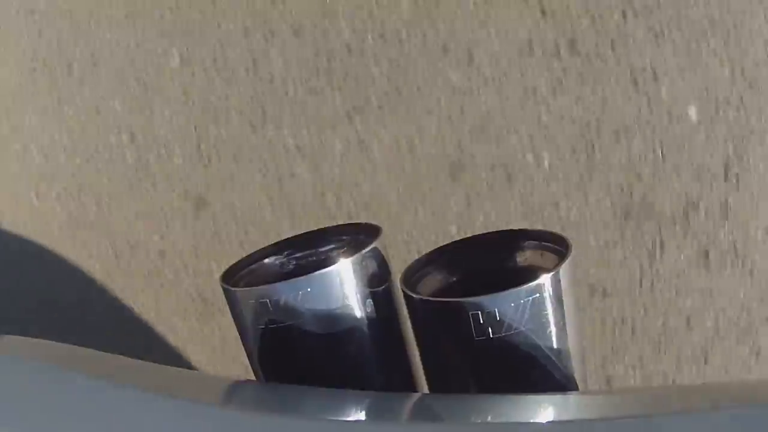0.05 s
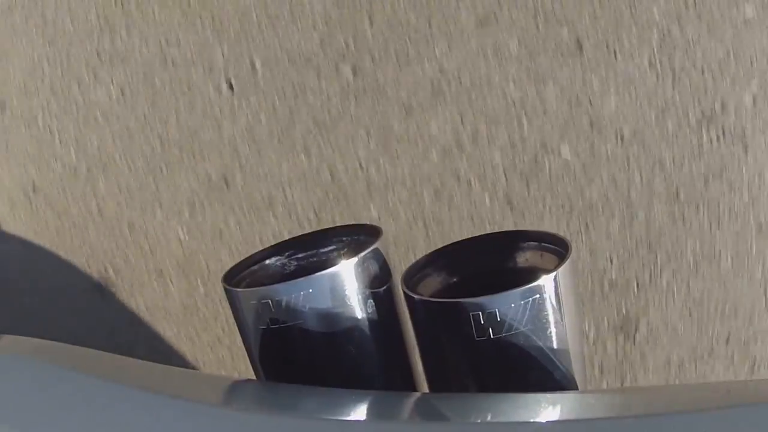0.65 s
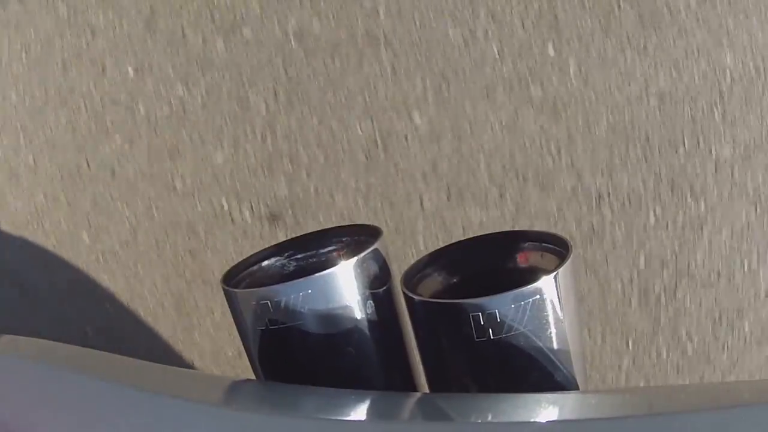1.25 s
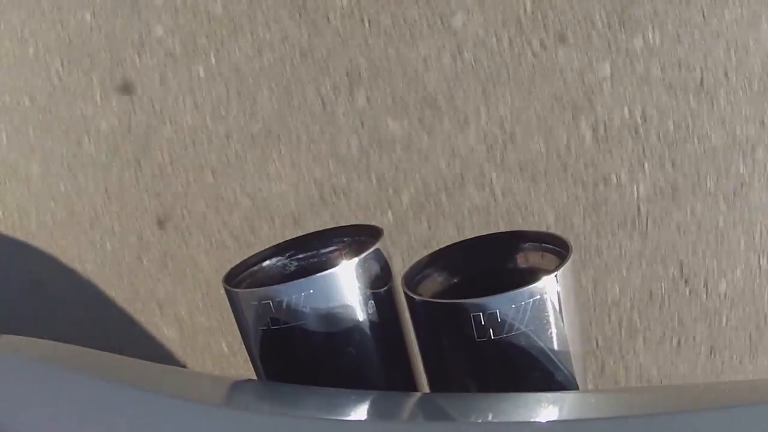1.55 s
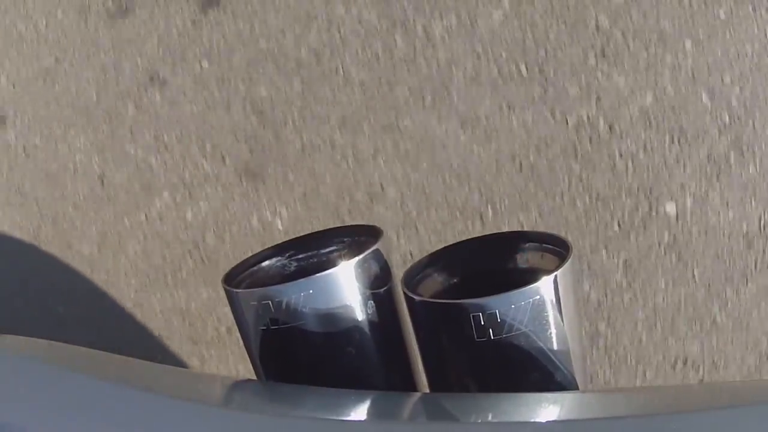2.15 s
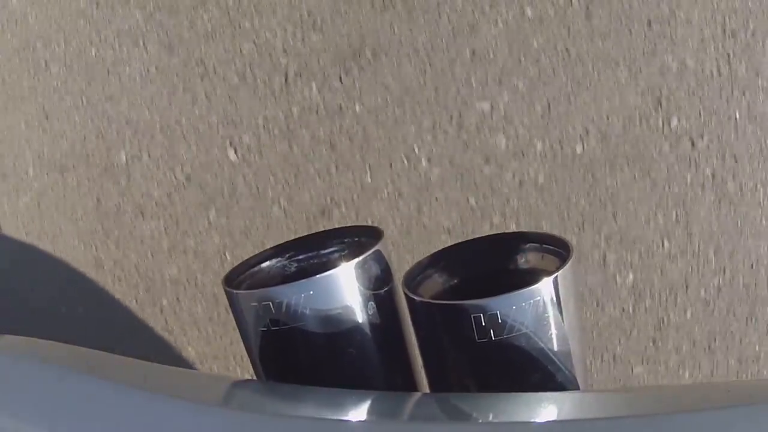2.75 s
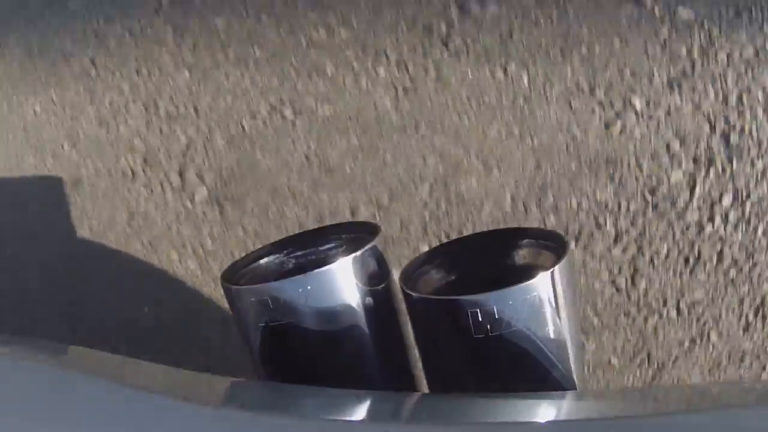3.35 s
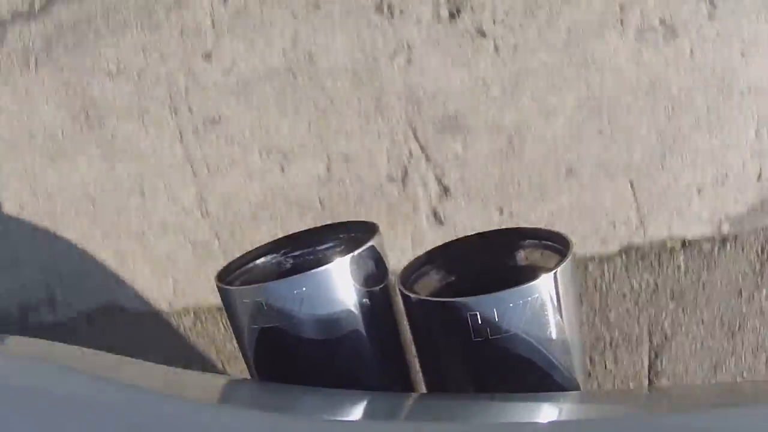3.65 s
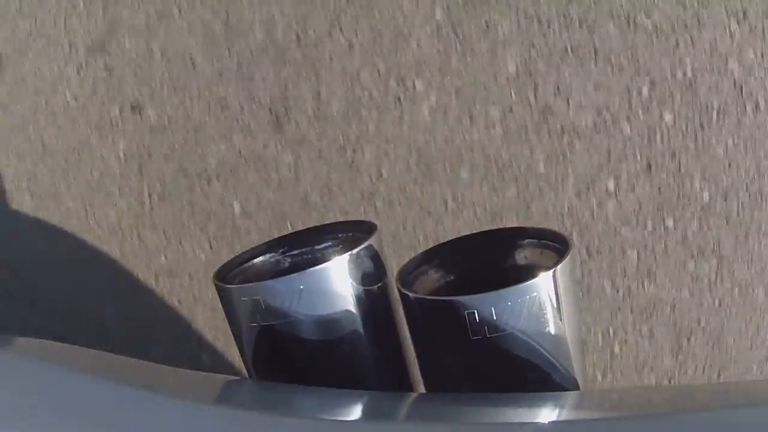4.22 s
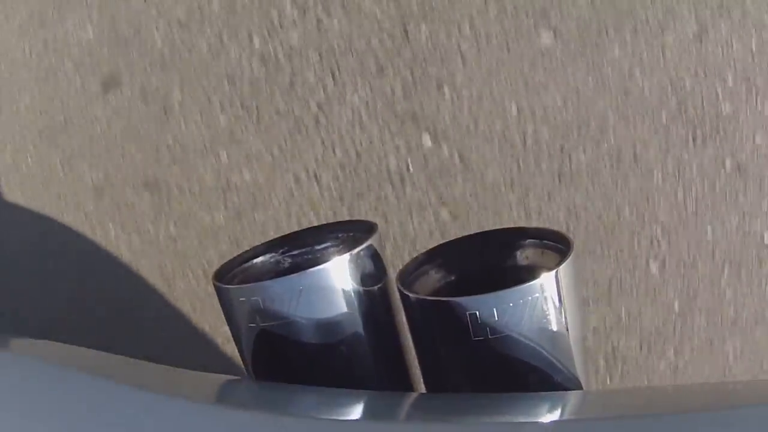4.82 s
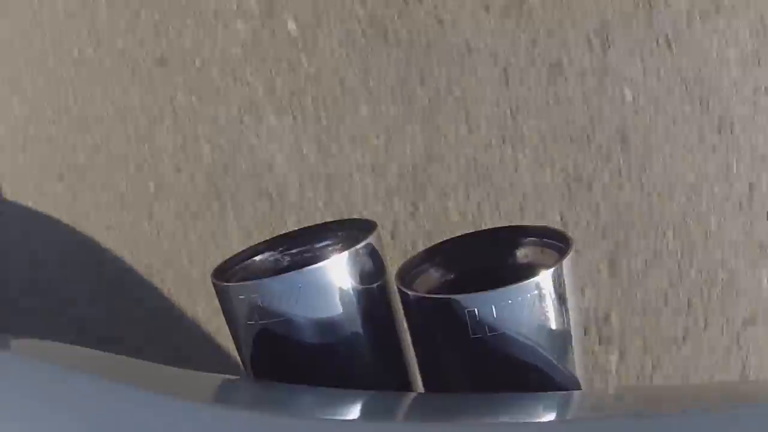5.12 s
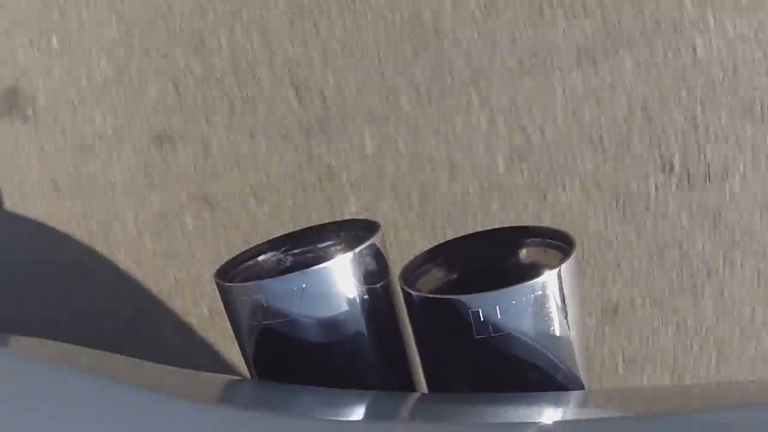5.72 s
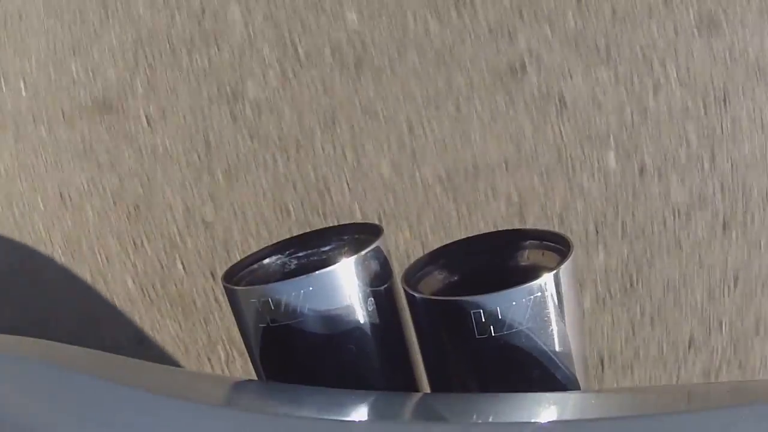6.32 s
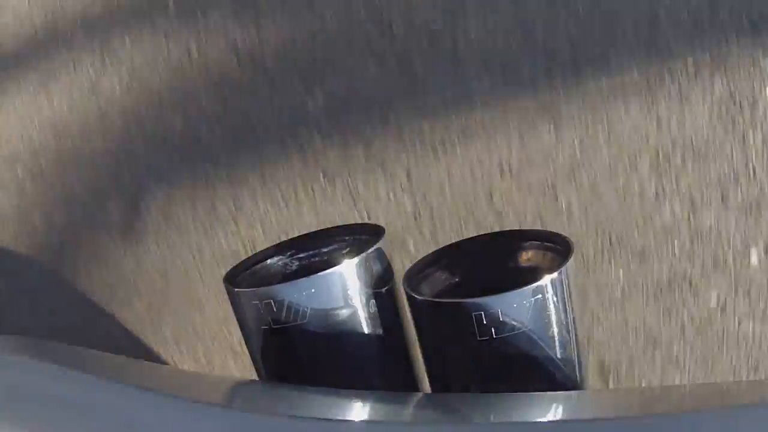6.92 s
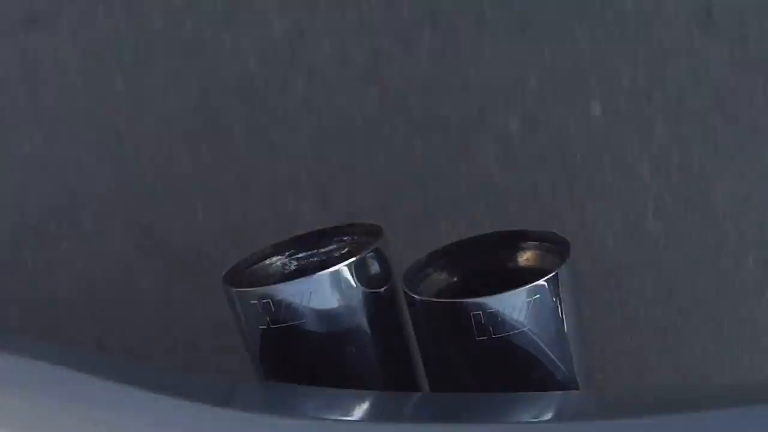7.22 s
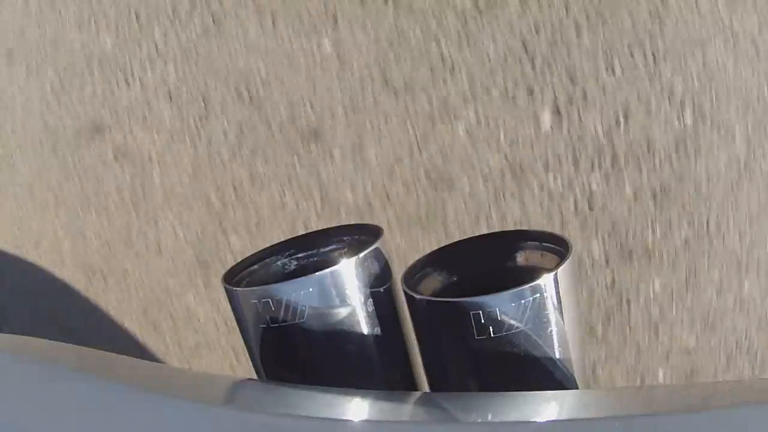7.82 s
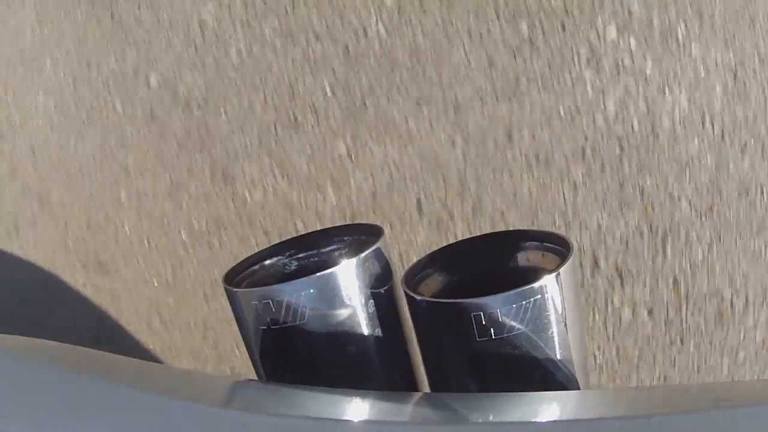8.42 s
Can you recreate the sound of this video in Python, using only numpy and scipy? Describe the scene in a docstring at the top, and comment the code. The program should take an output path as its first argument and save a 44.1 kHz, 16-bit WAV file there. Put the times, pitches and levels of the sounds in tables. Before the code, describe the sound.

A four-cylinder car is heard on the move from just above its twin tailpipes, with tyre rush and low wind rumble underneath. For the first 3 seconds the exhaust burbles and throbs at part throttle, revs swelling and sagging twice, with pops around 0.4 and 0.8 seconds and a scatter from 1.8 to 2.7. At about 3.3 seconds a faint motor whine with small clicks opens the exhaust flap. From 3.6 the engine pulls hard, climbing into a loud, raspy, howling roar that peaks near 5.1. One upshift drops the pitch with a rapid volley of pops, and the roar continues until 6 seconds. The throttle then lifts, leaving a deep drone that slowly falls in pitch. Around 8 seconds the flap faintly whirrs and clicks shut, with one pop and a wind gust, and the revs begin rising again.

```python
"""Four-cylinder car at the tailpipes

Heard from just above the twin tips while driving. Firing pulses burble through the pipe at part throttle.
A motor opens the exhaust flap; turbulent gas rings the open pipe and roars through one upshift with a
volley of fuel pops. The engine drones down on the overrun until the flap shuts. Tyres and wind rush below."""
import sys
import numpy as np
from scipy import signal
from scipy.fft import rfft, irfft, next_fast_len
from scipy.io import wavfile
from scipy.ndimage import uniform_filter1d

SR = 44100
rng = np.random.default_rng(int(sys.argv[2]) if len(sys.argv) > 2 else 0)


def waveform_to_disk(signal):
    """Save audio, clipped to [-1, 1], as 16-bit WAV at the path in sys.argv[1]."""
    frames = np.transpose(np.atleast_2d(signal))
    scaled = np.clip(frames, -1, 1) * 32767
    samples = np.round(scaled).astype(np.int16)
    wavfile.write(sys.argv[1], SR, samples)


N = 373086
TIME = np.arange(N) / SR

# silencer and open-pipe resonances: f/Hz, width/Hz, gain/dB
SILENCER_MODES = [(97.5, 17, -3), (173, 86, -3.5), (275, 15, 5), (520.5, 46, 0.5), (570, 110, -19.5)]
ROAR_MODES = [(452, 60, -1), (660, 130, -5), (770, 60, -8), (1000, 50, -11), (1160, 80, -11)]
# flap motor runs, opening then shutting: start/s, end/s, level/dB
FLAP_RUNS = [(3.293, 3.594, -44.5), (7.80, 8.147, -46)]
# running states, each level/dB: harmonics 1-4, overtones, cylinder imbalance, ragged firing, road rush
PART_THROTTLE = (-37, -21.5, -19.5, -25, -28, -3.5, -27, -28.5)
CRACKLE = (-29.5, -30, -27, -40, -32, -3, -28.5, -29.5)
THROB = (-24, -26.5, -24.5, -32.5, -33, -5, -28.5, -31)
LULL = (-32, -32.5, -27.5, -26.5, -44.5, 3, -39, -32.5)
LIGHT_PULL = (-18, -20.5, -24.5, -29, -45.5, 9, -31.5, -29)
HARD_PULL = (-18, -28, -15, -24, -26.5, -6, -26, -26.5)
GROWL = (-17, -21, -20.5, -32, -21, -5.5, -26.5, -24)
FULL_THROTTLE = (-22.5, -28, -23, -23.5, -32, -1.5, -31, -26.5)
LIFT_OFF = (-26, -24, -36, -41, -36.5, -5.5, -32.5, -34.5)
COASTING = (-13, -25, -24.5, -27, -28, -5, -41, -29.5)


def from_db(db):
    """Decibels to gain."""
    return 10 ** (np.asarray(db) / 20)


def rms_one(x):
    """Scale to rms 1."""
    return x / np.sqrt(np.mean(x ** 2) + 1e-20)


def in_time(points):
    """A (t/s, value) curve at every sample."""
    return np.interp(TIME, *np.transpose(points))


def at_hz(points, hz):
    """Read a spectrum on a log-frequency axis."""
    f, db = np.transpose(points)
    return np.interp(np.log(hz), np.log(f), db)


def ramp(start_s, length_s):
    """Rise from 0 to 1, then hold."""
    return np.clip((TIME - start_s) / length_s, 0, 1)


def swells(rows):
    """Sum of triangles, rows of t/s, half length/s, height."""
    return sum(height * np.maximum(1 - abs(TIME - s) / half_s, 0) for s, half_s, height in rows)


def drift(rate_hz):
    """Slow random wander, rms 1."""
    r = np.exp(-80 * np.pi * rate_hz / SR)
    slow = signal.lfilter([1], [1, -2 * r, r * r], rng.standard_normal(N // 40 + 2002))[2000:]
    return np.interp(np.arange(N) / 40, np.arange(len(slow)), rms_one(slow))


def noise(spectrum):
    """Coloured noise, rms 1, falling steeply below the first point."""
    size = next_fast_len(N, True)
    hz = np.maximum(np.fft.rfftfreq(size, 1 / SR), 1)
    gain = from_db(at_hz(spectrum, hz)) * np.minimum(hz / spectrum[0][0], 1) ** 4
    white = rng.standard_normal(2 * len(hz) - 2)
    return rms_one(irfft(rfft(white) * gain, size)[:N])


def resonate(x, modes):
    """Parallel resonators, rows of f/Hz, width/Hz, gain/dB."""
    out = 0
    for hz, width_hz, db in modes:
        r = np.exp(-np.pi * width_hz / SR)
        b = [(1 - r * r) / 2, 0, (r * r - 1) / 2]
        a = [1, -2 * r * np.cos(2 * np.pi * hz / SR), r * r]
        out += from_db(db) * signal.lfilter(b, a, x + 1e-18)
    return out


def cut(x, hz, kind, order=2):
    """Butterworth low- or high-pass."""
    return signal.sosfilt(signal.butter(order, hz, kind, fs=SR, output="sos"), x + 1e-18)


def driving():
    """Cross-faded running states: their columns and the engine level/dB at every sample."""
    # start/s, fade/s, running state, engine level/dB
    drive = [(0, .05, PART_THROTTLE, -0.5), (.2, 0.092, CRACKLE, 1.5), (.47, 0.045, THROB, 0),
             (1.21, 0.24, LULL, -7), (1.36, 0.092, PART_THROTTLE, -0.7), (1.76, .05, CRACKLE, -1),
             (2.32, .03, THROB, 0.4), (2.67, 0.074, LULL, 1.5), (2.93, 0.52, LIGHT_PULL, 1),
             (3.39, 0.15, HARD_PULL, 0), (3.96, 0.29, GROWL, 0), (4.45, 0.45, FULL_THROTTLE, -2.5),
             (5.35, 0.3, FULL_THROTTLE, 0.5), (5.94, 0.074, LIFT_OFF, 1.5), (6.13, 0.29, COASTING, -.5),
             (7.1, 0.38, COASTING, 0.5), (8.01, .17, PART_THROTTLE, .6)]
    settings = np.array([(*state, db) for _, _, state, db in drive])
    fades = np.array([ramp(start_s, fade_s) for start_s, fade_s, *_ in drive[1:]])
    return settings[0][:, None] + np.diff(settings, axis=0).T @ fades


def with_revs(law, firing_hz):
    """Gain rising with the firing rate up to a top."""
    top_db, top_hz, slope_db_per_hz = law
    return from_db(top_db - slope_db_per_hz * np.maximum(top_hz - firing_hz, 0))


def road_and_wind(rush_db):
    """Air and tyres rush, swelling at a bump; eddies behind the bumper buffet the microphone."""
    # spectra: f/Hz, relative density/dB
    road_spectrum = [(300, 4.5), (700, 1), (1000, 1.5), (1200, -3.5), (1450, -15.5), (2100, -15),
                     (2850, -30.5), (3800, -28), (5000, -31.5), (5750, -42), (6800, -39), (7800, -49.5),
                     (9200, -50.5), (14000, -72.5)]
    wind_spectrum = [(14, -11.5), (25, 13.5), (50, 16.5), (100, 6), (250, 10), (600, -56)]
    # wind: t/s, level/dB
    wind_level = [(0, -28.5), (3.2, -24), (4.35, -32.5), (4.7, -53), (6, -45.5), (6.4, -39), (8.46, -35.5)]
    # road bump and gusts: t/s, half length/s, rise/dB
    bumps = [(.787, 0.02, 9)]
    gusts = [(1.85, .12, 9), (3.68, .3, 7.5), (6.3, .12, 11.5), (8.05, .13, 22)]
    tyres = noise(road_spectrum) * from_db(rush_db + swells(bumps))
    eddies_db = 1.5 * drift(8)
    wind = noise(wind_spectrum) * from_db(in_time(wind_level) + swells(gusts) + eddies_db)
    return tyres + wind


def flap(rise_s=0.0018, decay_s=0.0096, fade_s=0.0091, click_db=-9, scrape_db=-9, waver_db=3):
    """A small motor whines as it turns the flap; the linkage scrapes and clicks against its stops."""
    # linkage clicks: t/s, relative level/dB, hard-stop share/dB
    knocks = [(3.308, -27.5, -18), (3.566, -29.5, -8.5), (7.809, -31.5, -17), (7.945, -42, -27),
              (7.998, -43, -30), (8.041, -39, -3), (8.066, -36, -20), (8.127, -37.5, -15.5)]
    # linkage and stop resonances: f/Hz, width/Hz, gain/dB
    linkage_modes = [(2830, 840, 9), (4280, 450, 16), (5070, 400, -1)]
    stop_modes = [(6900, 280, 10), (8540, 440, 9), (11800, 1200, -11)]
    # motor whine: f/Hz, relative level/dB
    whine_lines = [(2003, 1), (4006, -46)]
    linkage = rms_one(cut(resonate(rng.standard_normal(N), linkage_modes), 6000, "low", order=4))
    stop = rms_one(resonate(rng.standard_normal(N), stop_modes))
    clicks = 0
    for s, db, stop_db in knocks:
        envelope = ramp(s - rise_s, rise_s) * np.exp(-np.clip((TIME - s) / decay_s, 0, 50))
        clicks += from_db(db + click_db) * envelope * (linkage + from_db(stop_db) * stop)
    running = sum(from_db(db) * (ramp(start_s, fade_s) - ramp(end_s - fade_s, fade_s))
                  for start_s, end_s, db in FLAP_RUNS)
    whine = sum(np.sqrt(2) * from_db(db) * np.sin(2 * np.pi * hz * TIME) for hz, db in whine_lines)
    return clicks + running * (whine + from_db(scrape_db) * linkage) * from_db(waver_db * drift(20))


def puff(at_s, width_s=.0006):
    """Rounded suction pulse of height 1."""
    return -np.exp(-np.minimum(((TIME - at_s) / width_s) ** 2, 50))


def shift_pops(start_s=5.193, gap_s=.0255, level_db=-9, boom_db=-28):
    """The upshift cuts the ignition: about one pop per engine cycle, rows as in pops()."""
    return [(start_s + k * gap_s, level_db, boom_db) for k in range(6)]


def pops(rebound=0.27, rebound_s=0.00053, ring_db=9):
    """Unburnt fuel pops, rebounds from the open end and booms in the silencer; the volley rings the pipe."""
    # single pops: t/s, pulse level/dB, relative boom/dB
    fuel_pops = [(.374, -6, 1.5), (0.398, -5, 2), (.440, -18, -7), (.462, -9, 1.5), (.788, -0.5, -9),
                 (1.81, -13, 5.5), (1.862, -8, -6), (1.935, -9, -8), (1.957, -13, 6), (2.012, -12, 1),
                 (2.211, -10.5, 7), (2.310, -15.5, 13.5), (2.338, -14, 4.5), (2.735, -16, 5),
                 (8.04, -4, -6)]
    crack, boom = np.zeros(N), np.zeros(N)
    for s, level_db, boom_db in fuel_pops + shift_pops():
        pulse = from_db(level_db) * puff(s)
        crack += pulse - rebound * from_db(level_db) * puff(s + rebound_s)
        boom += from_db(boom_db) * pulse
    volley = sum(from_db(level_db) * puff(s) for s, level_db, _ in shift_pops())
    return crack + from_db(ring_db) * (resonate(boom, SILENCER_MODES) + resonate(volley, ROAR_MODES))


def howl(gas, firing_hz):
    """The strongest pipe resonance howls at high revs and partly sustains itself."""
    # f/Hz, width/Hz, gain/dB
    howl_mode = [(878, 32, 9)]
    ring = resonate(gas, howl_mode)
    power = uniform_filter1d(ring ** 2, size=900) / np.mean(ring ** 2) + 1e-6
    return np.interp(firing_hz, [128, 152], [.2, 1]) * ring / power ** .3


def roar(firings, firing_hz, pulsing=0.47, rasp=0.15, uneven=0.27, slowing_db=-2, sag_s=0.01):
    """Pedal down: each firing throws a pulse and turbulent gas that ring the pipe and hiss at the tips."""
    # gas leaving the tips: f/Hz, relative density/dB
    hiss_spectrum = [(1720, -5), (1850, -2), (2130, 2), (2450, -7), (3050, -17), (3800, -13), (4350, -14),
                     (5700, -27), (6750, -23), (7700, -29), (8900, -28), (12000, -40), (15500, -55)]
    # growth with revs: top level/dB, firing rate at the top/Hz, slope below it/(dB/Hz)
    roar_law = (-14.5, 133, 0.35)
    hiss_law = (-29.5, 131, 0.61)
    pedal = ramp(3.52, 0.13) - ramp(5.93, 0.14)
    slowing = uniform_filter1d(1. * (np.gradient(firing_hz) < 0), size=3000)
    beat = np.cos(2 * np.pi * firings)
    strokes = np.diff(np.floor(firings), prepend=0) * np.sqrt(SR / firing_hz)
    strokes *= 1 + uneven * np.cos(np.pi * firings)
    gas = rng.standard_normal(N) * (1 + pulsing * beat) + .5 * strokes
    pipe = resonate(gas, ROAR_MODES) + pedal ** 4 * howl(gas, firing_hz)  # howl dies first on lift-off
    pipe = cut(cut(pipe, 1270, "low", order=4), 330, "high")
    pipe /= np.sqrt(uniform_filter1d(pipe ** 2, size=4000) + 1e-12)  # flow keeps the ringing steady
    hiss = noise(hiss_spectrum) * (1 + rasp * beat) * from_db(0.95 * drift(40) + slowing_db * slowing)
    flow = with_revs(roar_law, firing_hz) * pipe + with_revs(hiss_law, firing_hz) * hiss * pedal
    sag = swells([(s + sag_s, sag_s, 0.82) for s, *_ in shift_pops()])  # flow dips after each shift pop
    return flow * np.sqrt(pedal) * (1 - sag)


def ragged_firing(firings, level_db):
    """Strokes burn stronger or weaker by chance; the differences thump in the silencer."""
    at = np.flatnonzero(np.diff(np.floor(firings)) > 0)
    strokes = np.zeros(N)
    strokes[at] = rng.uniform(0.062, 1, len(at)) * rng.choice([-1, 1], len(at))
    return from_db(level_db) * rms_one(cut(resonate(strokes, SILENCER_MODES), 900, "low"))


def engine_note(firings, firing_hz, low_db, overtone_db, imbalance_db, ragged_db):
    """Firing harmonics sweep through the pipe resonances; unequal cylinders add half orders."""
    # pipe response, flap shut and open: f/Hz, gain/dB
    shut_pipe = [(40, -2), (62, 6), (160, 6), (200, 1), (250, 0.5), (290, 7.5), (330, -1), (365, 1.5),
                 (410, -11.5), (500, -0.5), (630, -6), (720, -22.5), (950, -20), (1600, -38)]
    open_pipe = [(60, -7), (95, -0.5), (130, -3), (160, -2), (200, 4), (260, -4.5), (290, 1.5), (320, -3),
                 (370, 1.5), (420, -15), (480, -3), (550, -1.5), (630, 1.5), (720, -8.5), (810, -15),
                 (980, -16.5), (1600, -43)]
    unsteady = np.minimum(from_db(ragged_db + 25), 1)  # lines are clean without combustion
    opening = np.interp(TIME, np.array(FLAP_RUNS)[:, :2].ravel(), [0, 1, 1, 0])
    out = 0
    for k in np.arange(1, 29) / 2:
        hz = k * firing_hz
        pipe_db = (1 - opening) * at_hz(shut_pipe, hz) + opening * at_hz(open_pipe, hz)
        if k in (1, 2, 3, 4):
            level_db = low_db[int(k) - 1] + 1.16 * drift(18)
            phase = 0  # one shared trough per firing
        else:
            half_order = k % 1 > 0
            silencer_db = -8.5 * (k < 3) * (1 - opening)
            flutter_db = 4.5 * unsteady * drift(5.4)
            level_db = overtone_db + imbalance_db * half_order + silencer_db + flutter_db
            phase = .45 * unsteady * drift(12)
            phase -= (6 + 12 * opening) * (hz / 1000) ** 2  # pipe delays high lines, spreading the pulse
            phase += half_order * rng.uniform(0, 2 * np.pi)  # out of step: roughens without pulsing
        out -= np.sqrt(2) * from_db(level_db + pipe_db) * np.cos(2 * np.pi * k * firings + phase)
    return out


def scene(jitter=.003):
    """One crankshaft times the note, thumps and roar; pops, flap, road and wind join them. Mono."""
    # engine speed: t/s, firing rate/Hz
    firing_curve = [(0.0, 84.4), (0.21, 95.2), (0.53, 88.1), (1.39, 73.7), (1.78, 97.8), (2.42, 73.7),
                    (2.75, 64.0), (3.38, 80.4), (3.63, 94.0), (3.81, 90.3), (4.3, 114.3), (4.84, 159.6),
                    (5.14, 175.4), (5.39, 139.8), (5.59, 144.0), (5.91, 158.5), (6.09, 151.2),
                    (6.35, 157.8), (6.51, 150.8), (7.3, 123.3), (8.1, 92.3), (8.46, 117.4)]
    firing_hz = in_time(firing_curve)
    *low_db, overtone_db, imbalance_db, ragged_db, rush_db, engine_db = driving()
    firings = np.cumsum(firing_hz * (1 + jitter * drift(20))) / SR
    engine = engine_note(firings, firing_hz, low_db, overtone_db, imbalance_db, ragged_db)
    engine += ragged_firing(firings, ragged_db)
    exhaust = from_db(engine_db) * engine + roar(firings, firing_hz) + pops()
    return (exhaust + flap() + road_and_wind(rush_db))[None]


def record(dry, ceiling=0.69, cutoff_hz=15500):
    """Soft clip, then a steep low-pass."""
    rounded = dry / (1 + (dry / ceiling) ** 6) ** (1 / 6)
    return signal.sosfilt(signal.cheby2(12, 70, cutoff_hz, fs=SR, output="sos"), rounded)


dry = scene()
out = record(dry)
waveform_to_disk(out)
```